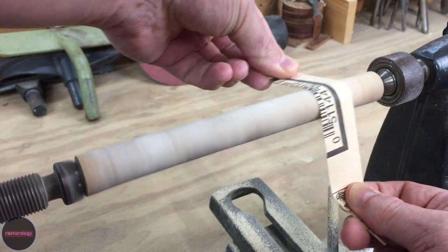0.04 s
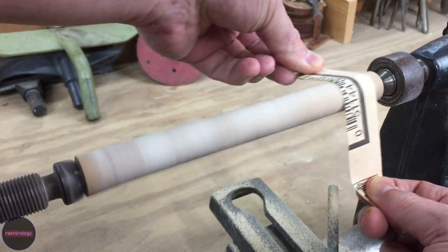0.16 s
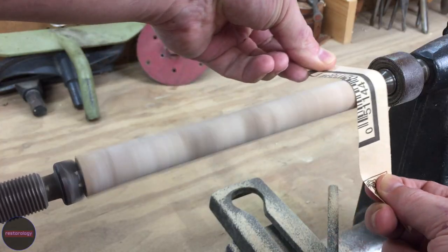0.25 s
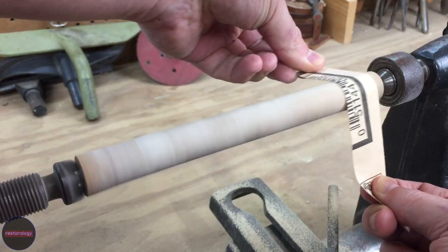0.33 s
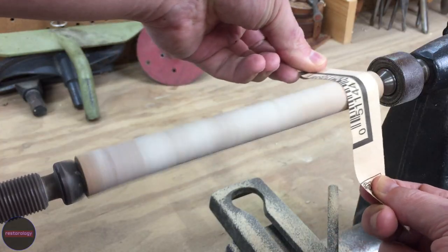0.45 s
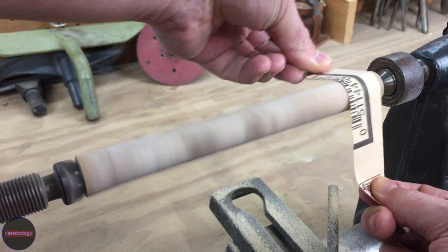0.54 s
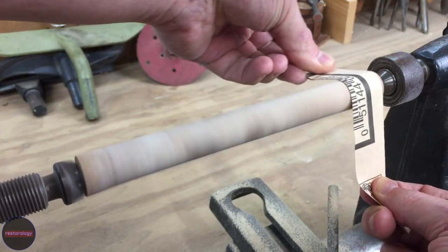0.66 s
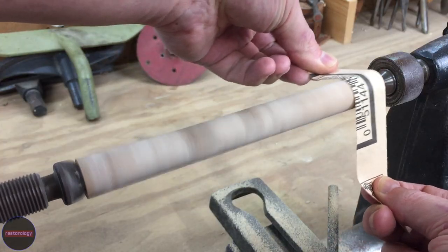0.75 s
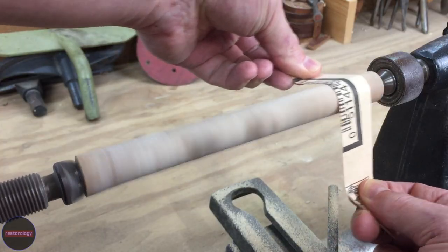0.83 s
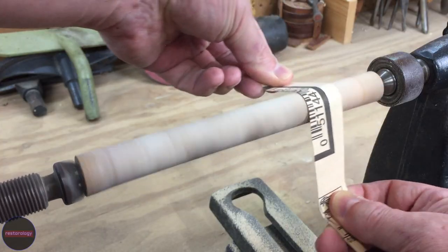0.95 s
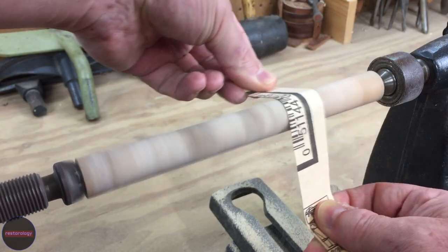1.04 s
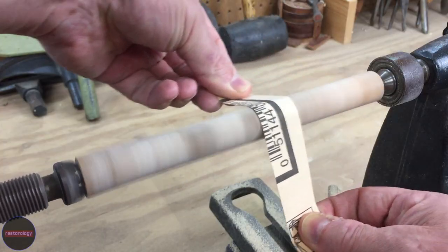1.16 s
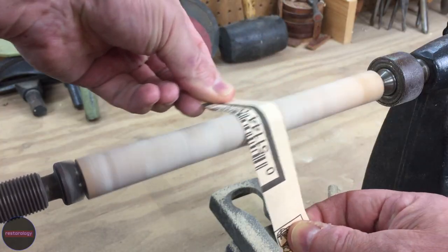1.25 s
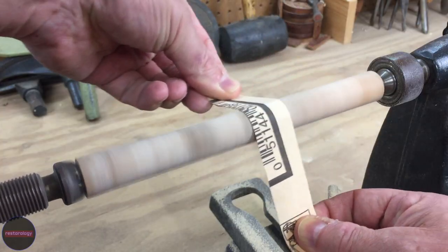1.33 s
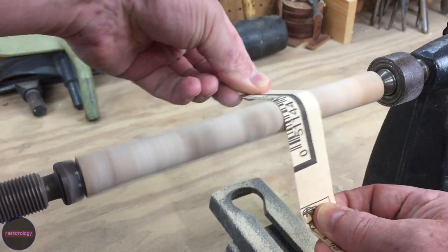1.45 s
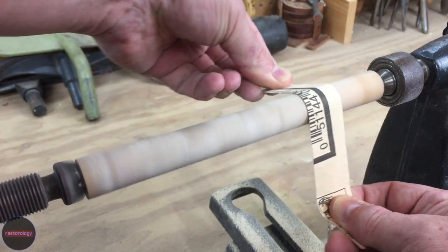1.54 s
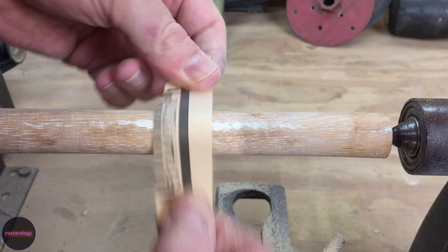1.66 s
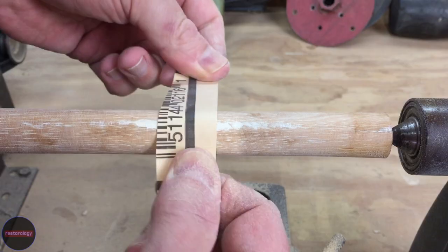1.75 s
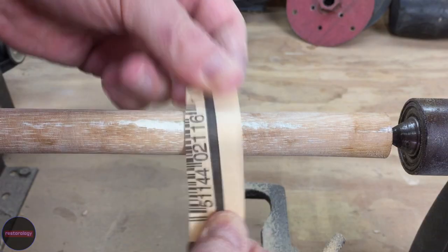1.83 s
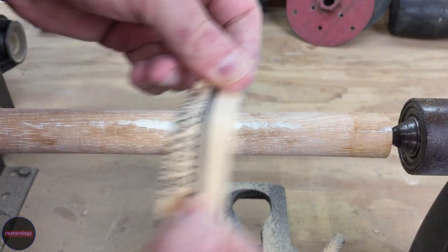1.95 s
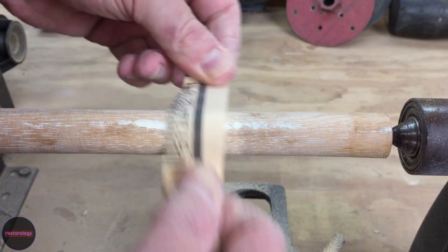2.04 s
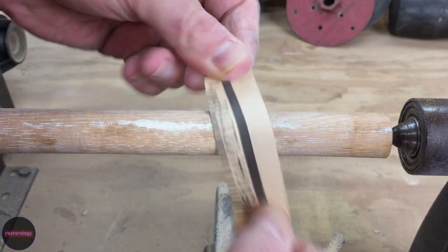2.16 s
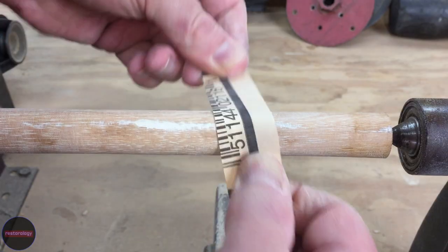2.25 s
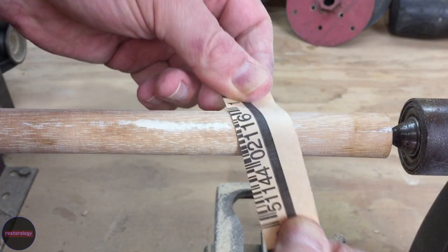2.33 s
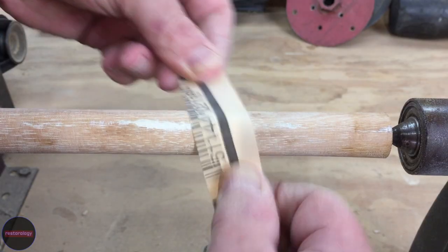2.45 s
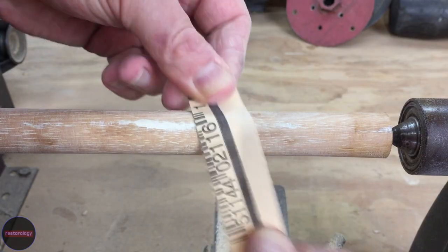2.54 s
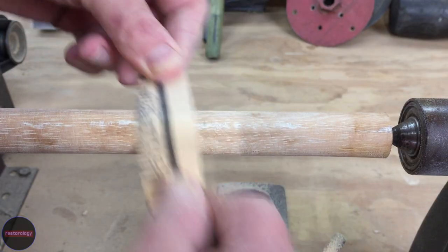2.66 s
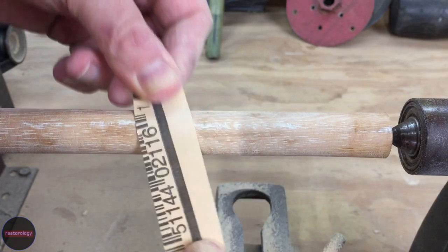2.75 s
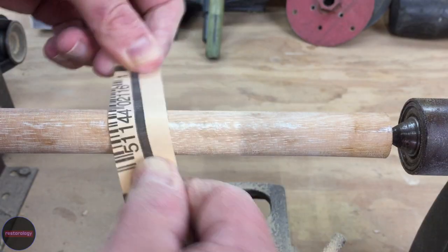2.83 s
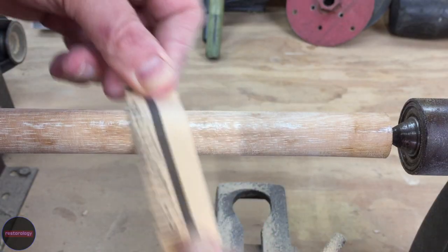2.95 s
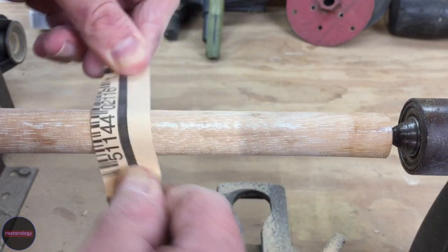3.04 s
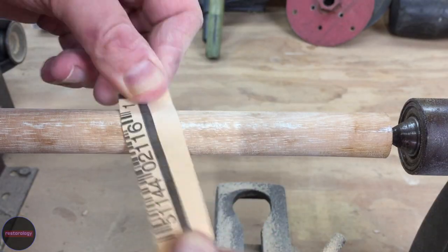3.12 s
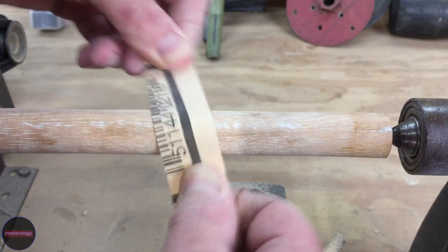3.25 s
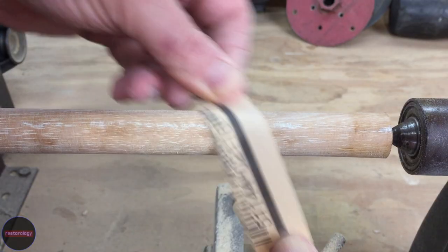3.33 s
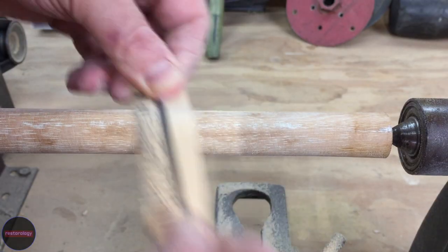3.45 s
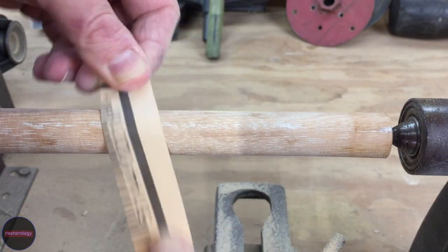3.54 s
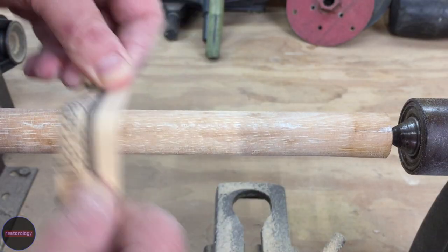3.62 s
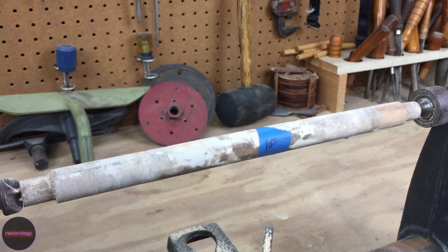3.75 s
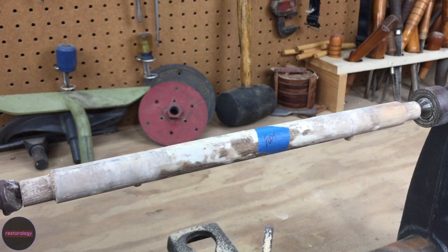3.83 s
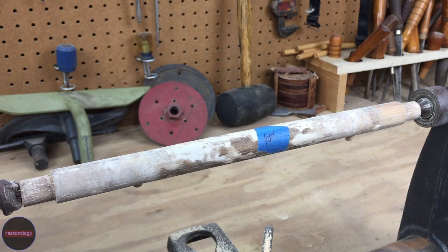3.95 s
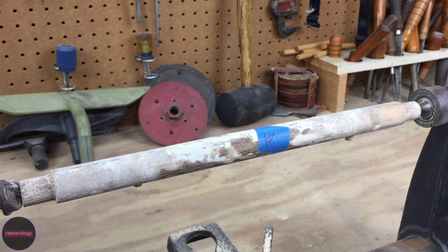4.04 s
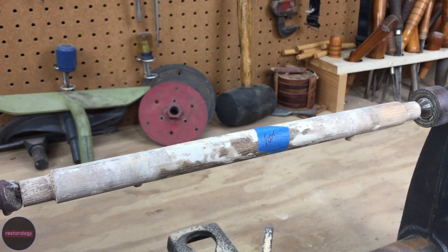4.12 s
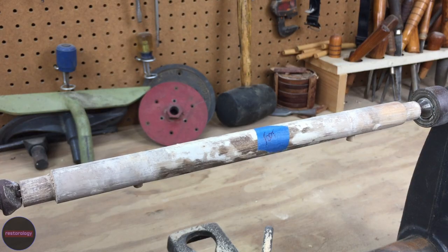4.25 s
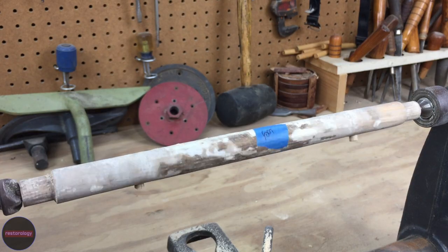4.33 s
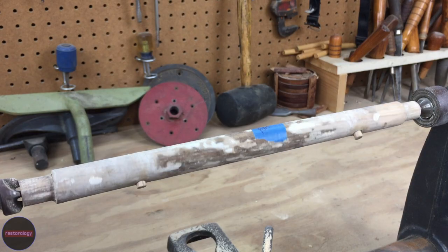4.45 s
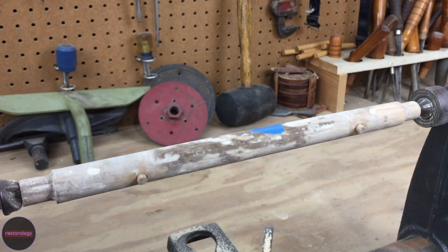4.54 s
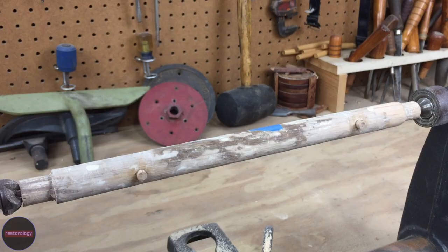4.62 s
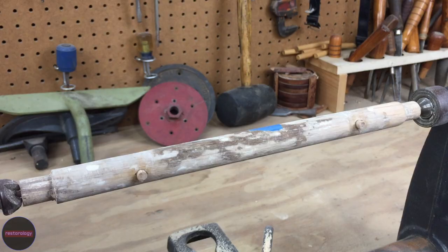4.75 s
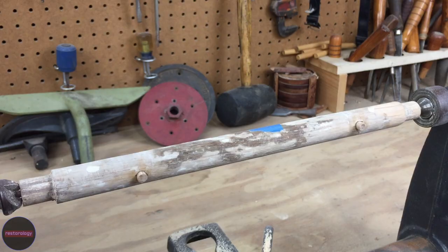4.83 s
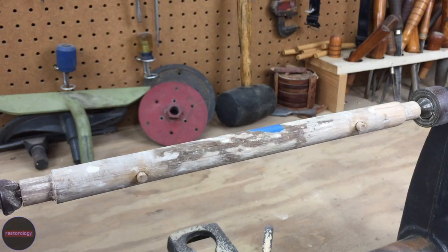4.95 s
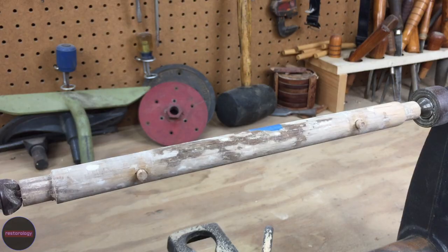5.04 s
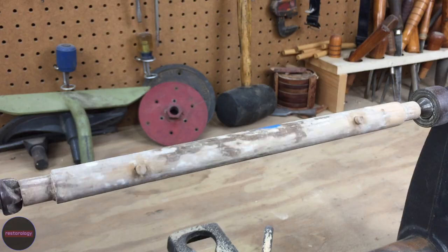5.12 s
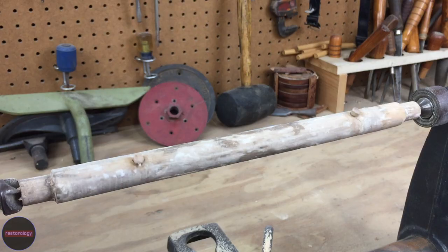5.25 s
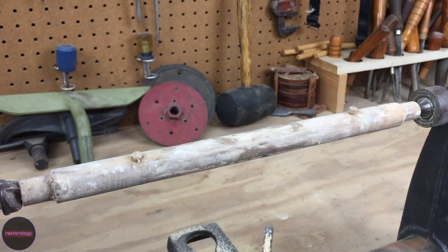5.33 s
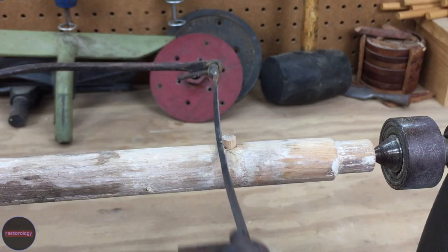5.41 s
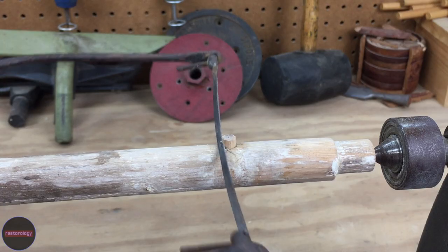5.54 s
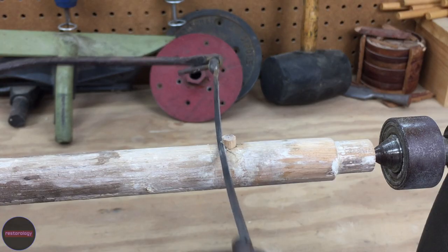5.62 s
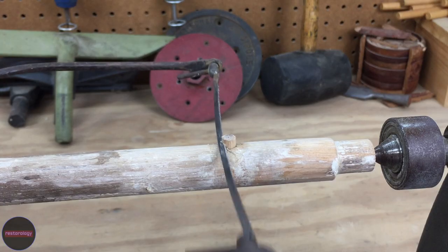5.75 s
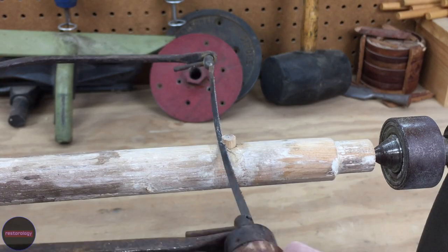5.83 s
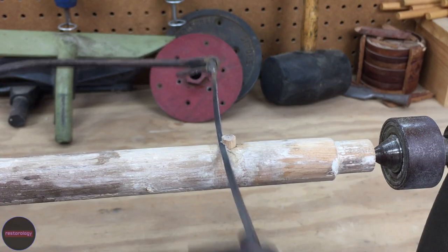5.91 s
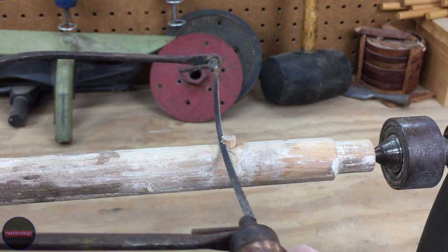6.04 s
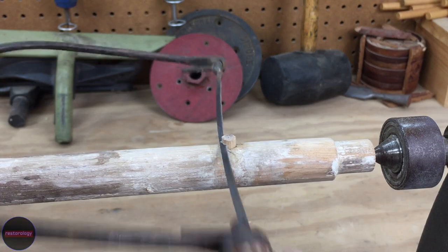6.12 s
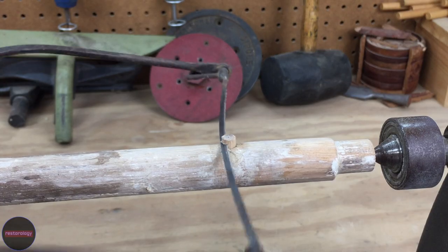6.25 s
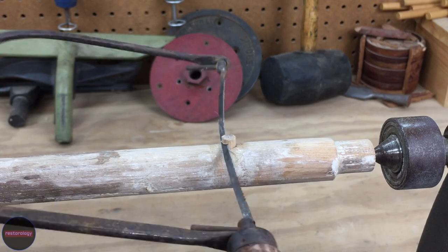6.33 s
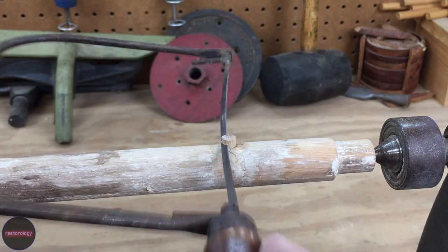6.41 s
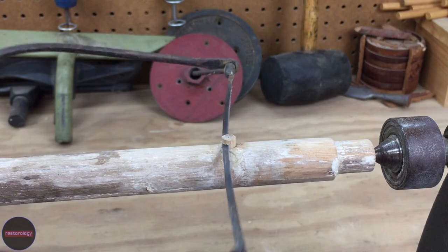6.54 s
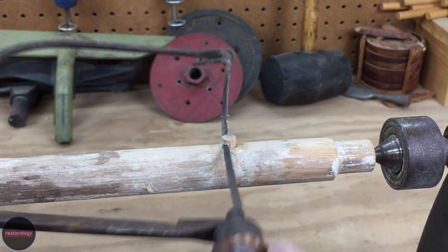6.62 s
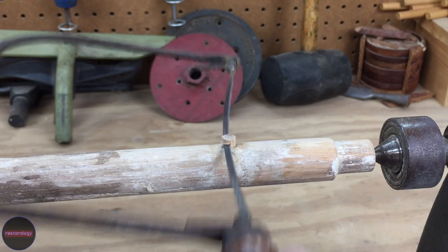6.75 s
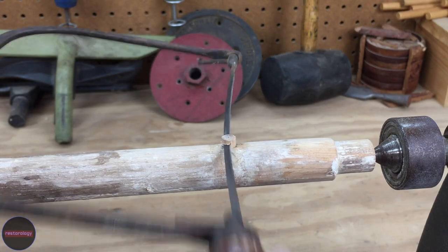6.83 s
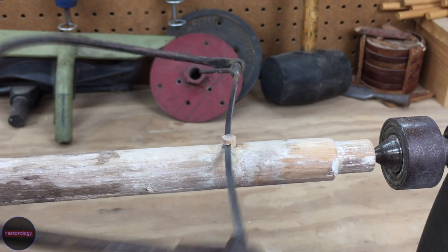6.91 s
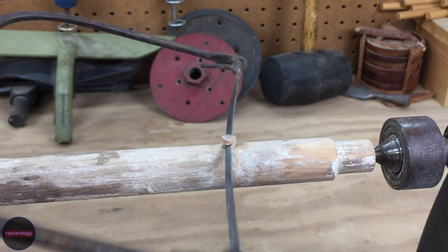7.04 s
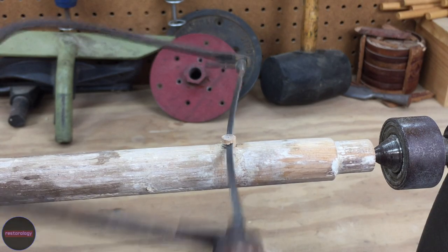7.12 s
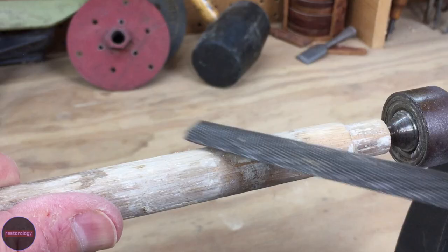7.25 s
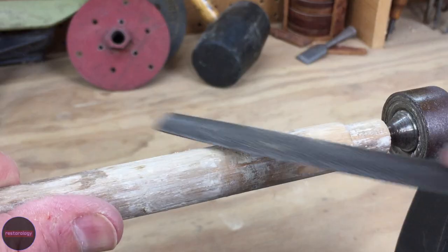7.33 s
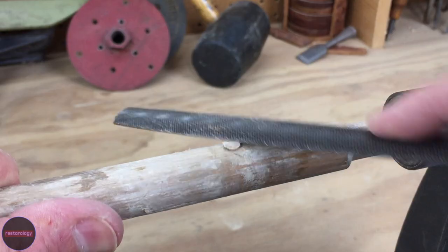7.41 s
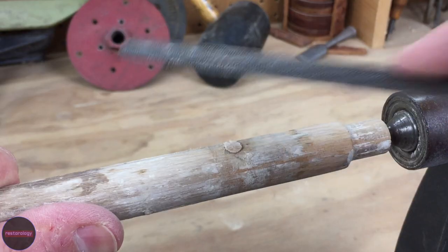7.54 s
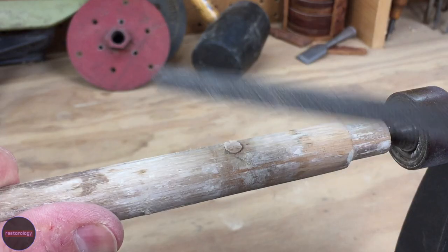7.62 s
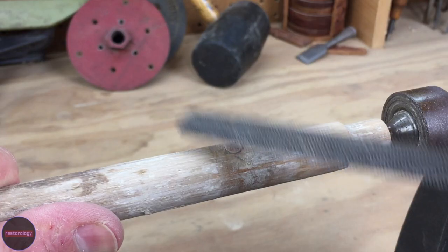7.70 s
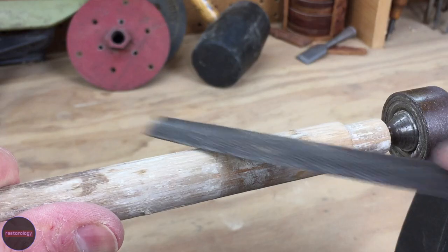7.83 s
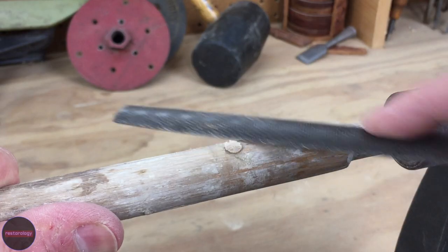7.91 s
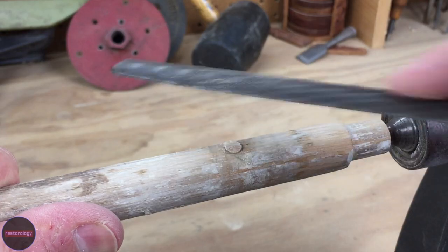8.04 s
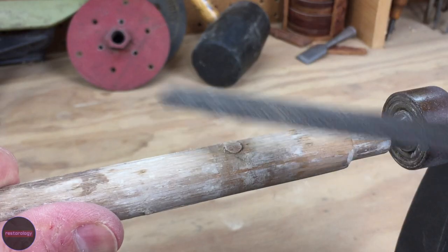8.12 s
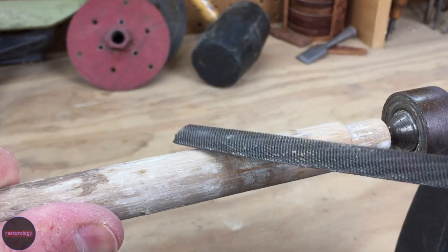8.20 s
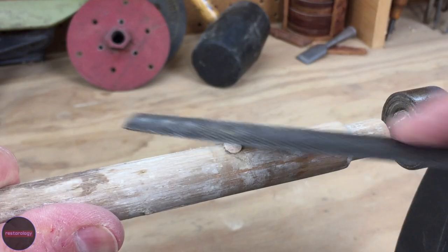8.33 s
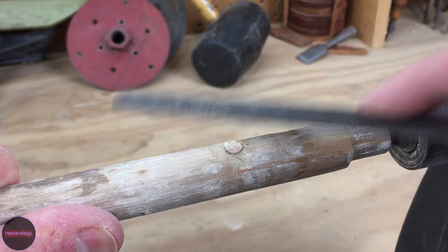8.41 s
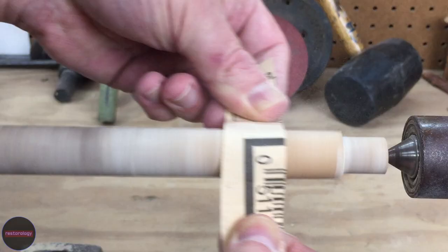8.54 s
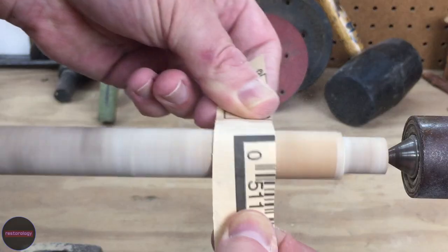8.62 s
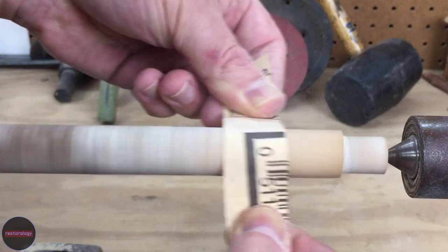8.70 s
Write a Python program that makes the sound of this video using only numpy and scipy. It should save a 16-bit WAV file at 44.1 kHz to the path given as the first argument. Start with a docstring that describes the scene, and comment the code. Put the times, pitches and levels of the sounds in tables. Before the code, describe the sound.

Six abrupt workshop cuts: lathe hum with hissing paper, rapid scrubbing, faint ticks, gritty sawing, three knocking rasp scrapes, lathe hum returning.

```python
"""A lathe motor rumbles and hums while sandpaper hisses on a spinning dowel: the first of six abrupt workshop shots.
Then come time-lapsed hand sanding, a quiet look at the stick, time-lapsed sawing of a knot, three rasp strokes
and the lathe again. Motor lines are wavering sines; friction is grainy noise, shaped by stroke bells and
resonances of wood and saw frame. Blows ring decaying modes, over a bench shake and a faint room tone."""
import sys
import numpy as np
from scipy import signal
from scipy.fft import rfft, irfft, next_fast_len
from scipy.io import wavfile
from scipy.ndimage import uniform_filter1d, map_coordinates

SR = 44100
rng = np.random.default_rng(int(sys.argv[2]) if len(sys.argv) > 2 else 0)


def wav_record(signal):
    """Record a signal, one row per channel, as 16-bit PCM in the file named by sys.argv[1]."""
    frames = np.transpose(np.atleast_2d(signal))
    bounded = np.clip(frames, -1, 1)
    # unit amplitude maps onto the largest positive 16-bit level
    quanta = np.round(bounded * 32767).astype(np.int16)
    wavfile.write(sys.argv[1], SR, quanta)


def attenuation_scalar(level_db):
    """Turn a level in dB into a linear amplitude multiplier (20 dB per decade)."""
    decades = np.asarray(level_db, float) / 20
    return 10 ** decades


N = 386757
T = np.arange(N) / SR


def unit(x):
    """Scaled to rms 1."""
    return x / np.sqrt(np.mean(x ** 2) + 1e-20)


def along(points, hz):
    """(Hz, value) points read on a log frequency axis."""
    f, v = np.transpose(points)
    return np.interp(np.log(hz + 1), np.log(f + 1), v)


def curves(tables):
    """A gain per sample for each dB column, silent outside the tables."""
    total = 0
    for table in tables:
        s, *columns = np.transpose(table)
        total = total + np.array([attenuation_scalar(np.interp(T, s, db, -200, -200)) for db in columns])
    return total


def drive(rows):
    """A gain per sample from one (s, dB) curve, held at its ends."""
    return attenuation_scalar(np.interp(T, *np.transpose(rows)))


def gate(shots):
    """1 inside the shots, with 2 ms edges."""
    return sum(np.clip(np.minimum(T - start, end - T) / .002, 0, 1) for start, end in shots)


def bump(s, spread):
    """A Gaussian bell over time, height 1, around s seconds."""
    return np.exp(-.5 * ((T - s) / spread) ** 2)


def wobble(rate):
    """A smooth random curve, rate knots a second."""
    return map_coordinates(rng.standard_normal(int(N * rate / SR) + 4), [T * rate])


def filtered(x, response):
    """x times a complex response of frequency."""
    m = next_fast_len(N + SR // 2)
    return irfft(rfft(x, m) * response(np.fft.rfftfreq(m, 1 / SR)), m)[:N]


def resonant(x, peaks):
    """x through causal (Hz, width, dB) resonances of alternating sign, rms gain 1."""
    f = np.fft.rfftfreq(next_fast_len(N + SR // 2), 1 / SR)
    body = 0
    for k, (centre, width, db) in enumerate(peaks):
        damping = 1j * f * width
        body = body + (-1) ** k * attenuation_scalar(db) * damping / (centre * centre - f * f + damping)
    return filtered(x, lambda hz: unit(np.abs(body)) * np.exp(1j * np.angle(body)))


def grit(rough_db, patchy_db):
    """Friction noise: grains bite in millisecond clumps, and the colour shifts in patches."""
    z = signal.stft(rng.standard_normal(N), nperseg=512)[2]
    field = uniform_filter1d(rng.standard_normal(z.shape), size=8, axis=0)
    field = uniform_filter1d(field, size=4, axis=1)
    noise = signal.istft(z * attenuation_scalar(patchy_db * unit(field)), nperseg=512)[1][:N]
    return unit(noise * attenuation_scalar(rough_db * wobble(700)))


def coloured(x, spectrum):
    """x given a spectrum, rms 1."""
    return unit(filtered(x, lambda hz: attenuation_scalar(along(spectrum, hz))))


def strokes(rows, width, drag_db):
    """Tool speed: a bell for each stroke over the drag that remains at the turnarounds."""
    rise_share = .85  # below 1, a stroke rises faster than it falls
    s, peak = np.transpose(rows)
    marks = np.bincount(np.round(s * SR).astype(int), attenuation_scalar(2 * peak), N)
    t = np.arange(-6000, 6001) / SR
    bell = np.exp(-.5 * (t / width / np.where(t < 0, rise_share, 2 - rise_share)) ** 2)
    drag = attenuation_scalar(np.interp(T, s, peak) + drag_db)
    return np.sqrt(np.abs(signal.fftconvolve(marks, bell, "same")) + drag ** 2)


def every_third(rows):
    """All strokes of a steady rhythm from the rows of every third one."""
    steps = np.arange(3 * len(rows) - 2) / 3
    return [np.interp(steps, np.arange(len(rows)), column) for column in np.transpose(rows)]


def ring(modes, seconds):
    """One blow on a set of decaying (Hz, dB, t60) modes, each at a new strength."""
    t = np.arange(int(seconds * SR)) / SR
    return sum(attenuation_scalar(db + rng.normal(0, 0.65) - 60 * t / t60) * np.sin(2 * np.pi * hz * t) for hz, db, t60 in modes)


def add(x, s, sound):
    """Mixes a sound in at s seconds."""
    part = x[round(s * SR):][:len(sound)]
    part += sound[:len(part)]


# Shots with the lathe running. Each row: start in seconds, end in seconds.
SPIN_SHOTS = [(-1, 1.614), (8.573, 9)]
# Lathe loudness. Each row: time in seconds, paper hiss in dB and motor rumble in dB, both before their trims.
SPIN_LEVELS = [(0, -34, -30.5), (.85, -35, -29.5), (1.15, -32.5, -30), (1.61, -33, -30.5), (8.6, -32, -30)]
# Motor hum; the last two are high whines. Each row: pitch in Hz, rms level in dB at a rumble of -34.5 dB.
MOTOR_LINES = [(43.5, -54.5), (118.4, -47.5), (236.9, -45.5), (355.3, -50.5), (480, -57.5), (1852, -55.5),
               (2406, -60)]
# Extra hum in the last shot. Each row: pitch in Hz, rms level in dB at a rumble of -34.5 dB.
LAST_SHOT_LINES = [(301.5, -50.5), (419.9, -45)]
# Swell of the two lowest hum lines. Each row: time in seconds, gain in dB.
LOW_HUM_SWELL = [(0, 1), (.6, -4.5), (.8, 0.5), (1.6, 5.5)]
# Motor rumble colour. Each row: frequency in Hz, relative density in dB.
RUMBLE_COLOUR = [(25, -2), (114, -2.5), (167, -6), (236, 1.5), (480, -5.5), (560, -20.5), (1200, -44)]
# Colour of paper on spinning wood. Each row: frequency in Hz, relative density in dB.
SPIN_HISS_COLOUR = [(290, -61), (500, -4.5), (1220, -7), (1750, -7), (1880, -4), (2650, -9), (6090, -7.5),
                    (15500, -4.5)]


def lathe():
    """Slightly unsteady motor lines over rumble, and the smooth hiss of paper on the spinning wood."""
    levels = np.array(SPIN_LEVELS)
    hiss, rumble = drive(levels[:, [0, 1]]), drive(levels[:, [0, 2]])
    first_shot, last_shot = gate(SPIN_SHOTS[:1]), gate(SPIN_SHOTS[1:])
    # lines under 1 kHz share one motor clock, whose speed wavers
    clock = T + np.cumsum(0.01206 * wobble(13)) / SR
    tones = []
    for hz, db in MOTOR_LINES + LAST_SHOT_LINES:
        level = attenuation_scalar(db + 3 + 1.5 * wobble(9.1))  # 3 dB turns rms into peak
        jitter = np.sqrt(hz / 900) * wobble(20)
        tones.append(level * np.sin(2 * np.pi * hz * (clock if hz < 1000 else T) + jitter))
    hum = drive(LOW_HUM_SWELL) * sum(tones[:2]) + sum(tones[2:-4])
    hum += first_shot * sum(tones[-4:-2]) + last_shot * sum(tones[-2:])
    body = attenuation_scalar(-7.0) * rumble * coloured(rng.standard_normal(N), RUMBLE_COLOUR)
    motor = hum * rumble / attenuation_scalar(-34.5) + body
    paper = attenuation_scalar(3.0) * coloured(grit(rough_db=0.8, patchy_db=0.8), SPIN_HISS_COLOUR)
    # in the first shot a tighter strip sings in two bright bands, which grow faster than the hiss
    singing = unit(resonant(rng.standard_normal(N), [(6180, 110, 1.8), (14100, 740, .1)]))
    singing *= (hiss / attenuation_scalar(-31.0)) ** 3 * first_shot
    return gate(SPIN_SHOTS) * (motor + hiss * (paper + singing))


# Shots of hand work: sanding, looking, sawing, rasping. Each row: start in seconds, end in seconds.
HAND_SHOTS = [(1.614, 3.741), (3.741, 5.408), (5.408, 7.282), (7.282, 8.573)]
# Every third forth-and-back sanding cycle. Each row: time in seconds, pressure in dB before trim,
# back stroke over forth stroke in dB.
SANDING_CYCLES = [(1.618, -32, -2.5), (1.777, -26.5, -4), (1.938, -28.5, -1), (2.114, -25.5, -2.5),
                  (2.279, -27, -4), (2.434, -26.5, -3), (2.593, -29.5, 3), (2.75, -28, -1.5),
                  (2.911, -26, -0.5), (3.069, -27, -0.5), (3.229, -28.5, 2), (3.388, -27.5, 1.5),
                  (3.549, -25.5, -2), (3.713, -28, -3.5)]
# The hands falter after a jolt. One row: time in seconds, spread in seconds, level change in dB.
FALTER = (2.05, .016, -7.5)
# How hard sanding drives the stick. Each row: time in seconds, level in dB before the stroke pulsing.
STICK_DRIVE = [(1.63, -42.5), (2.3, -39), (3.74, -36.5)]
# The strip catches and jolts the stick. Each row: time in seconds, level in dB.
JOLTS = [(1.993, -29), (2.62, -32)]
# Hand sanding colour. Each row: frequency in Hz, relative density in dB.
PAPER_COLOUR = [(760, -14.5), (1300, -3), (1460, -6), (1870, -3.5), (2300, -4), (4850, -5.5), (6290, -2.5),
                (15500, -5)]
# The stick between centres under the paper. Each row: pitch in Hz, width in Hz, relative level in dB.
SANDED_STICK_MODES = [(309, 18, -11), (554, 60, -8), (731, 31, 0.5), (895, 91, -6.5), (1150, 190, -11.5),
                      (1900, 90, -12)]


def sanding():
    """Each stroke hisses and excites the stick, whose modes ring between strokes."""
    forth_s, forth_db, over_db = every_third(SANDING_CYCLES)
    back_s = forth_s + .025
    rows = np.stack([[forth_s, forth_db], [back_s, forth_db + over_db]], -1).reshape(2, -1).T
    falter_s, falter_spread, falter_db = FALTER
    rows[:, 1] += falter_db * np.exp(-.5 * ((rows[:, 0] - falter_s) / falter_spread) ** 2)
    rows[:, 1] += .7 * rng.standard_normal(len(rows))  # dB by which strokes differ by chance
    hiss = coloured(grit(rough_db=0.0, patchy_db=1.66), PAPER_COLOUR)
    paper = attenuation_scalar(2.12) * strokes(rows, width=0.0049, drag_db=-17.0) * hiss
    # dividing by a slow version keeps the rhythm and evens out the pressure
    pulsing = 2.57 * strokes(rows, width=0.0035, drag_db=-4.0) / strokes(rows, width=0.04, drag_db=-35.5)
    push = drive(STICK_DRIVE) * pulsing * grit(rough_db=4.5, patchy_db=1.5)
    jolts = strokes(JOLTS, width=0.0066, drag_db=-57.0) * rng.standard_normal(N)
    return gate(HAND_SHOTS[:1]) * (paper + resonant(push + jolts, SANDED_STICK_MODES))


# Sawing shots. Each row: start in seconds, end in seconds.
SAW_SHOTS = [(5.408, 6.42), (6.45, 7.282)]
# Every third saw stroke, one list a shot. Each row: time in seconds, pressure in dB before trim.
SAW_STROKES = [
    [(5.42, -44), (5.532, -44.5), (5.635, -43), (5.743, -44.5), (5.852, -45.5), (5.959, -41),
     (6.062, -40.5), (6.171, -39.5), (6.281, -38), (6.388, -37)],
    [(6.474, -39), (6.576, -39.5), (6.678, -41.5), (6.779, -36.5), (6.881, -38.5), (6.985, -40),
     (7.087, -35), (7.19, -39.5), (7.29, -35)],
]
# The teeth bite deep. Each row: time in seconds, level in dB before trim.
DEEP_BITES = [(5.495, -39.5), (6.282, -39), (6.462, -39), (6.813, -40), (7.05, -37), (7.191, -32),
              (7.222, -47)]
# How hard the saw frame is driven. Each row: time in seconds, level in dB before the stroke pulsing.
FRAME_DRIVE = [(5.42, -42.5), (6.1, -34.5), (6.8, -34), (7.2, -32.5)]
# Saw teeth colour. Each row: frequency in Hz, relative density in dB.
TEETH_COLOUR = [(600, -44), (976, -4), (1540, -11), (1930, -9), (2830, -10), (3330, -15), (4430, -8),
                (5400, -22), (7900, -28), (9400, -24.5), (10700, -24.5), (12200, -22), (13500, -24),
                (14700, -20), (15500, -23)]
# Resonances of saw frame and stick. Each row: pitch in Hz, width in Hz, relative level in dB.
FRAME_MODES = [(177.6, 18, -4), (343, 41, -4.5), (563, 53, -14), (708, 63, -16.5), (985, 20, -12),
               (1274, 71, -18)]


def sawing():
    """Coarse teeth chatter through the knot and shake the saw frame and the stick."""
    rows = np.hstack([every_third(shot) for shot in SAW_STROKES]).T
    # strokes differ by chance in time (s) and level (dB)
    rows = rows + [0.0023, 1.04] * rng.standard_normal(rows.shape)
    biting = np.array(sorted([*map(tuple, rows), *DEEP_BITES]))
    chatter = coloured(grit(rough_db=2.5, patchy_db=2.5), TEETH_COLOUR)
    teeth = attenuation_scalar(-0.1) * strokes(biting, width=0.0036, drag_db=-8.5) * chatter
    pulsing = 2.09 * strokes(rows, width=0.0039, drag_db=-5.5) / strokes(rows, width=0.072, drag_db=-30)
    frame = resonant(drive(FRAME_DRIVE) * pulsing * grit(rough_db=0.5, patchy_db=1.0), FRAME_MODES)
    return gate(SAW_SHOTS) * (teeth + frame)


# Rasp strokes. Each row: start in seconds, length in seconds, teeth in dB and wood in dB, before trims.
RASP_STROKES = [(7.322, 0.23, -28.5, -21.5), (7.826, 0.23, -27.5, -22.5), (8.287, 0.22, -29.5, -22.5)]
# The one shape of a rasp stroke. Each row: share of the stroke, teeth in dB, wood in dB, added to the stroke's own.
STROKE_SHAPE = [(0.039, -36, -0.5), (.12, -24, -8.5), (.27, -4, -8), (.42, -.5, -1.5), (.6, -2, -2.5),
                (.82, -8, -5.5), (1.002, -36, -17.5)]


def rasp_effort():
    """Gains of teeth and wood: the one stroke shape, stretched and scaled for each stroke."""
    share, teeth_shape, wood_shape = np.transpose(STROKE_SHAPE)
    tables = []
    for s, length, teeth_db, wood_db in RASP_STROKES:
        tables.append(np.transpose([s + length * share, teeth_shape + teeth_db, wood_shape + wood_db]))
    return curves(tables)


# The two ways the stick bends, in Hz: lower, upper.
BEND_HZ = (352, 393)


def stick_bend(peak_s, lower_db, upper_db):
    """The stick bends two ways that beat; driven in fits, the bend swells, then dies as a ring."""
    half_s, t60_s = .035, .4
    late = T - peak_s
    tail = attenuation_scalar(-14 - 60 * np.abs(late) / t60_s) * np.clip(late / half_s + 1, 0, 1)
    swell = np.exp(-.5 * (late / half_s) ** 2) + tail
    bend = np.zeros(N)
    for hz, db in zip(BEND_HZ, (lower_db, lower_db + upper_db)):
        rough = 1.1 * wobble(50)
        bend += attenuation_scalar(db + 2.5 * wobble(40)) * swell * np.sin(2 * np.pi * hz * T + rough)
    return bend


# The iron lathe bed rings on. Each row: pitch in Hz, relative level in dB, 60 dB decay in seconds.
BED_MODES = [(694, 3, .9), (721, -7, .85), (1314, -9, .6), (1692, -10, .5)]


def bed_ring(bed_db, tilt_db):
    """The lathe bed fades in and rings; close modes beat, so the ring wavers. tilt_db: brightness per octave."""
    modes = [(hz, bed_db + db + tilt_db * np.log2(hz / 1000), t60) for hz, db, t60 in BED_MODES]
    fade_in = np.minimum(np.arange(SR) / SR / 0.023, 1)
    return fade_in * attenuation_scalar(2 * wobble(28)[:SR]) * ring(modes, 1.)


# The rasp lands. Each row: time in seconds, level in dB before trims, delay of the stick's bend in seconds,
# bend in dB, upper bend over lower in dB, lathe bed in dB, brightness of the bed ring in dB per octave.
LANDINGS = [(7.3281, -12, 0.18, -30, -18, -44.5, -1), (7.828, -7, .17, -31.5, 3, -49.5, 10),
            (8.2896, -9.5, 0.14, -31, 4, -49, 1)]
# The stick struck by steel. Each row: pitch in Hz, relative level in dB, 60 dB decay in seconds.
KNOCK_MODES = [(898, -12, 0.21), (1500, -17, .03), (2013, -5, .04), (2182, 1.5, 0.04), (2506, -3.5, 0.035)]
# The stick under the rasp. Each row: pitch in Hz, width in Hz, relative level in dB.
RASPED_STICK_MODES = [(251, 100, -6.5), (604, 113, -5), (908, 40, 1.5), (1060, 106, -0.5), (1493, 156, -5),
                      (1950, 91, -2.5), (2244, 174, -6), (2970, 640, -18.5)]


def rasp_landings():
    """The rasp brushes the wood, cracks and knocks, bounces once, and sets stick and lathe bed ringing."""
    knock_db, rebound_s, rebound_db = -9, 0.0071, -8
    graze_s, graze_db, graze_hz = .025, -46, 3100
    out, blows, t = np.zeros(N), np.zeros(N), np.arange(SR // 8) / SR
    graze_n = round(graze_s * SR)
    for s, db, bend_s, bend_db, upper_db, bed_db, tilt_db in LANDINGS:
        crack = attenuation_scalar(db + 4.5 - 60 * t / 0.0026) * np.minimum(t / 0.00025, 1) * np.sin(2 * np.pi * 2900 * t)
        add(out, s + 0.00117, crack)
        add(out, s + 0.001194, attenuation_scalar(db + knock_db) * ring(KNOCK_MODES, .15))
        add(out, s + 0.00112 + rebound_s, attenuation_scalar(db + knock_db + rebound_db) * ring(KNOCK_MODES, .15))
        brush = np.sin(2 * np.pi * graze_hz * t + wobble(300)[:len(t)])[:graze_n]
        add(out, s - graze_s, attenuation_scalar(db + graze_db) * np.linspace(0, 1, graze_n) * brush)
        add(blows, s + 0.00121, attenuation_scalar(db - 8 - 60 * t / 0.046) * rng.standard_normal(len(t)))
        out += stick_bend(s + bend_s, bend_db, upper_db)
        add(out, s + 0.2, bed_ring(bed_db, tilt_db))
    # hard steel contact favours the upper modes
    hard = filtered(blows, lambda hz: (hz / 1500) ** 2 / (1 + (hz / 3300) ** 4))
    return out + resonant(hard, RASPED_STICK_MODES)


# Decay of the walls. Each row: frequency in Hz, 60 dB decay in seconds.
WALL_DECAY = [(200, 0.46), (2000, 0.25), (10000, .15)]


def walls(dry):
    """Reverberation: noise that dies at its own pace in each band."""
    hz, t, z = signal.stft(rng.standard_normal(SR // 2), SR, nperseg=256)
    tail = signal.istft(z * attenuation_scalar(-60 * t / along(WALL_DECAY, hz)[:, None]), SR, nperseg=256)[1]
    return signal.fftconvolve(dry, tail / np.linalg.norm(tail))[:N]


# Rasp teeth colour. Each row: frequency in Hz, relative density in dB.
RASP_COLOUR = [(1410, -23), (2400, -1.5), (2590, -11), (3280, 0), (3770, -6), (5200, -6), (7050, -19.5),
               (9330, -8.5), (12000, -21.5), (15500, -20)]


def rasp():
    """The rasp lands with a crack, then tears forward; stick, lathe bed and walls answer."""
    lumps_db = 1.2  # uneven bite along the stroke
    teeth, wood = rasp_effort()
    push = wood * attenuation_scalar(lumps_db * wobble(45)) * grit(rough_db=1.5, patchy_db=1.4)
    tearing = coloured(grit(rough_db=2.5, patchy_db=2.0), RASP_COLOUR)
    dry = teeth * attenuation_scalar(lumps_db * wobble(90)) * tearing
    dry += attenuation_scalar(-2.5) * resonant(push, RASPED_STICK_MODES)
    dry += rasp_landings()
    return gate([(7.3, SPIN_SHOTS[1][0])]) * (dry + attenuation_scalar(-11.5) * walls(dry))


# Paper or saw teeth snag and let go. Each row: time in seconds, level in dB before the envelope.
SNAPS = [(3.0875, 0.5), (6.386, -21.5), (7.086, -21), (7.191, -13)]


def snaps():
    """Bright cracks of a few milliseconds: twice-differenced noise that swells and dies."""
    out, t = np.zeros(N), np.arange(400) / SR
    for s, db in SNAPS:
        crack = np.diff(rng.standard_normal(len(t) + 2), 2) / 2
        add(out, s, attenuation_scalar(db - 60 * t / 0.015) * np.minimum(t / 0.0039, 1) * crack)
    return out


# Short pitched scratches of the tools, and two faint squeaks while the stick is handled.
# Each row: time in seconds, level in dB, pitch in Hz, half length in seconds.
SCRATCHES_AND_SQUEAKS = [(1.885, -32, 1890, .004), (1.991, -35, 1900, .004), (2.039, -32, 560, 0.011),
                         (2.107, -30.5, 2900, 0.0036), (2.168, -34, 2700, .004),
                         (2.28, -29.5, 1860, 0.0034), (4.13, -76, 2700, 0.021), (4.9, -73, 2850, 0.027),
                         (6.055, -40.5, 2320, 0.0056), (6.059, -38, 1240, .006), (7.432, -29, 1000, 0.0077),
                         (7.435, -31.5, 564, 0.0083), (8.004, -28, 1150, .009), (8.426, -30, 1070, 0.014)]


def scratches_and_squeaks():
    """Short pitched bursts of narrow noise."""
    out, t = np.zeros(N), np.arange(-SR // 8, SR // 8) / SR
    for s, db, hz, half in SCRATCHES_AND_SQUEAKS:
        narrow = signal.iirpeak(hz, 11, SR)  # 11: pitch over width
        band = unit(signal.lfilter(*narrow, rng.standard_normal(len(t))))
        add(out, s + t[0], attenuation_scalar(db) * np.exp(-(t / half) ** 2 / 4) * band)
    return out


# Fingers turn the stick. Each row: time in seconds, tick level in dB before trim, thud over the tick in dB before trim.
TICKS = [(4.178, -75, 14), (4.299, -68, 6), (4.7306, -48, -12), (4.974, -75, 14), (5.127, -47.5, -20),
         (5.1836, -47, -27), (5.2532, -46.5, -19)]
# Skin slides on bark. Each row: time in seconds, spread in seconds, level in dB.
RUSTLES = [(4.03, 0.029, -63.5)]
# What hums faintly while the stick is turned. Each row: pitch in Hz, width in Hz, relative level in dB.
HELD_MODES = [(137, 27, 3.5), (356, 31, -2)]


def fingers():
    """Soft ticks with a wooden thud, a faint bright rustle and a faint hum."""
    ticks, thuds = np.zeros(N), np.zeros(N)
    for s, db, thud_db in TICKS:
        add(ticks, s - .004, attenuation_scalar(db - 10.0) * np.hanning(900))
        add(thuds, s - .014, attenuation_scalar(db + thud_db + 1) * np.hanning(1500))
    slide = sum(attenuation_scalar(db) * bump(s, spread) for s, spread, db in RUSTLES)
    hum = attenuation_scalar(-69 + 3.6 * wobble(5.4)) * resonant(rng.standard_normal(N), HELD_MODES)
    hum *= gate(HAND_SHOTS[1:2])
    tick_colour = [(700, -30.5), (1000, -1), (1600, -16), (3000, 3.0), (6000, -1), (9000, -17.5)]  # (Hz, dB)
    tick = coloured(grit(rough_db=3.0, patchy_db=4.0), tick_colour)
    skin = coloured(grit(rough_db=3, patchy_db=2), [(5000, -30), (9000, 0), (14000, -2)])
    thud = resonant(thuds * rng.standard_normal(N), FRAME_MODES[1:4])
    return ticks * tick + thud + slide * skin + hum


# Bench shake in each shot of hand work. Each row: start level in dB, end level in dB, before bumps and lumps.
BENCH_LEVELS = [(-51.5, -48.5), (-62.5, -61.5), (-38, -38), (-54, -54)]
# The hand bumps the bench. Each row: time in seconds, gain over its shake in dB.
BUMPS = [(4.31, 13.5), (4.72, 10)]
# The bench's low resonance. Each row: frequency in Hz, relative density in dB.
BENCH_COLOUR = [(30, -10), (45, 2), (62, 9.5), (85, 1), (130, -14), (200, -64)]


def bench():
    """A lumpy low shake under all the hand work, weaker while the saw pauses."""
    pause = 1 - 0.72 * gate([(SAW_SHOTS[0][1], SAW_SHOTS[1][0])])
    level = sum(attenuation_scalar(np.interp(T, shot, ends)) * gate([shot]) for ends, shot in zip(BENCH_LEVELS, HAND_SHOTS))
    level += attenuation_scalar(-20.0) * rasp_effort()[1]  # the rasp pushes the whole bench
    level *= attenuation_scalar(sum(db * bump(s, 0.023) for s, db in BUMPS))
    return level * pause * attenuation_scalar(1.3 * wobble(18)) * coloured(rng.standard_normal(N), BENCH_COLOUR)


# Room tone colour. Each row: frequency in Hz, relative density in dB.
ROOM_COLOUR = [(53, -28.5), (90, -10.5), (183, -9), (342, -12.5), (810, -21), (2770, -24.5), (15500, -35.5)]


def room():
    """Faint dark noise under everything, its level drifting and its colour shifting in patches."""
    return attenuation_scalar(-67 + 0.98 * wobble(6)) * coloured(grit(rough_db=-0.2, patchy_db=2.5), ROOM_COLOUR)


def scene():
    """All sources over the room tone, alike in both channels."""
    tools = lathe() + sanding() + sawing() + rasp() + snaps()
    mono = tools + scratches_and_squeaks() + fingers() + bench() + room()
    return np.array([mono, mono])


def roll_off(x):
    """The treble ends steeply here."""
    return signal.sosfilt(signal.butter(12, 17000, fs=SR, output="sos"), x)


def record(dry):
    """One mono microphone with two dips in the treble and a band limit."""
    def microphone(hz):
        """Gain at each frequency."""
        dips_db = -4 * np.exp(-((hz - 4900) / 300) ** 2) - 3.6 * np.exp(-((hz - 10400) / 350) ** 2)
        limit_db = -np.clip(hz - 15700, 0, 300) / 4
        return attenuation_scalar(dips_db + limit_db)

    mono = filtered(dry[0], microphone)
    return roll_off(np.array([mono, mono]))


dry = scene()
out = record(dry)
wav_record(out)
```